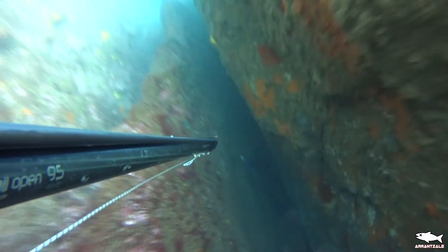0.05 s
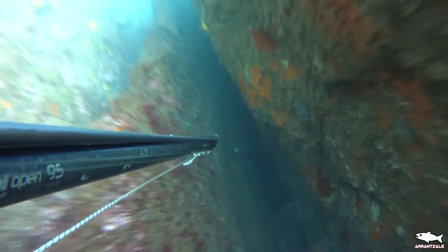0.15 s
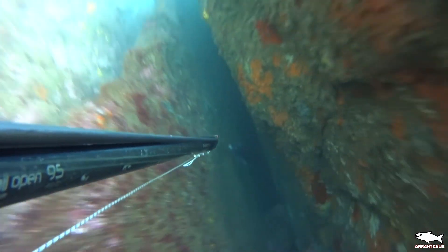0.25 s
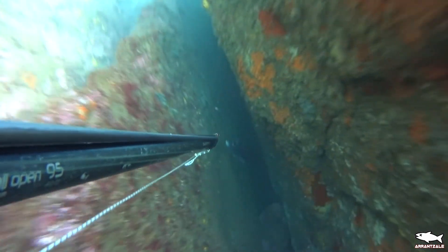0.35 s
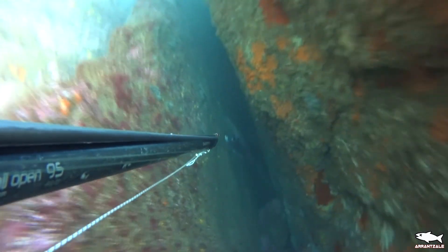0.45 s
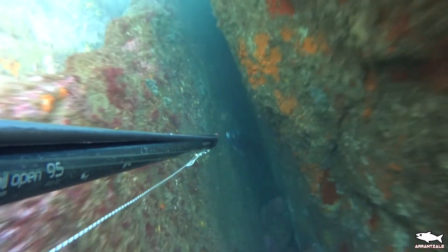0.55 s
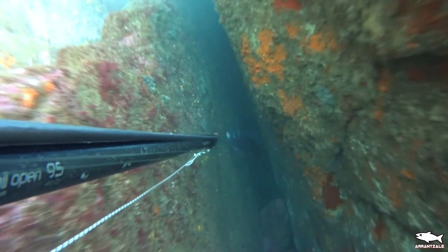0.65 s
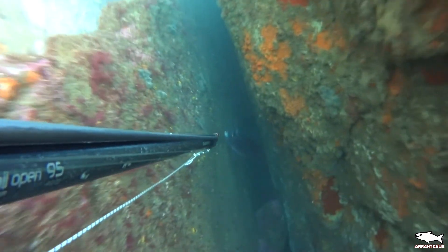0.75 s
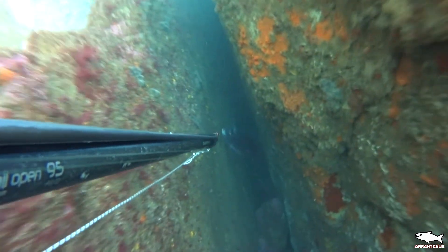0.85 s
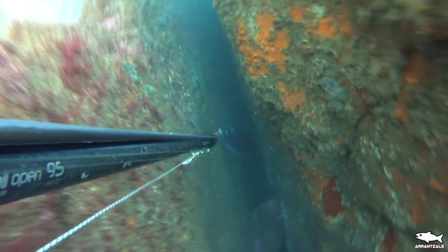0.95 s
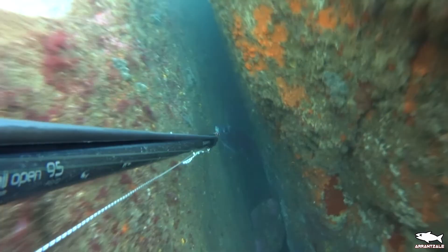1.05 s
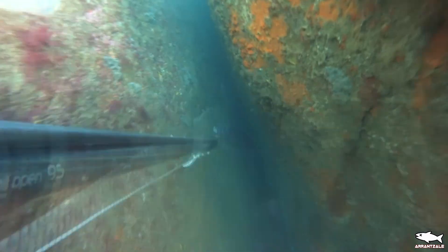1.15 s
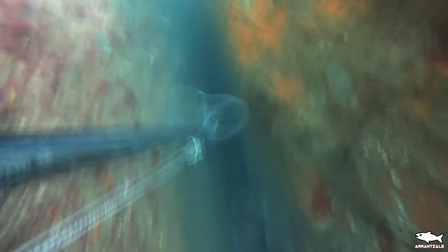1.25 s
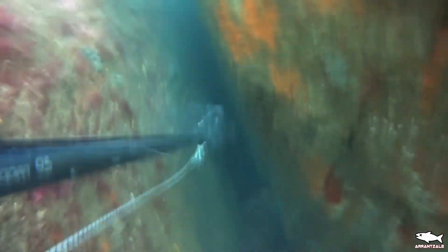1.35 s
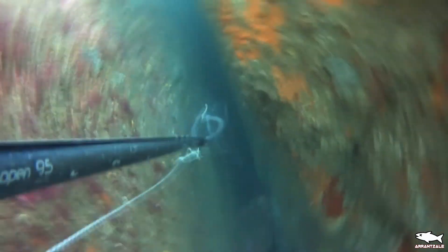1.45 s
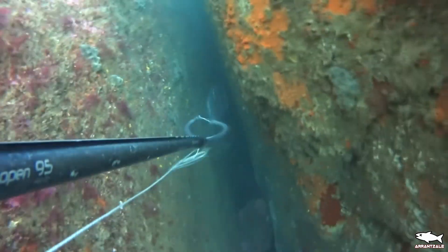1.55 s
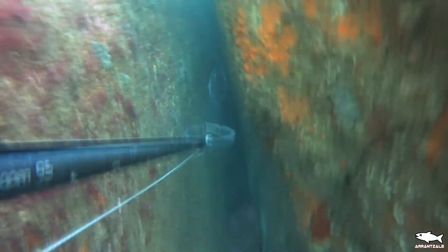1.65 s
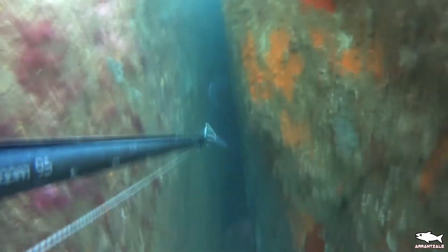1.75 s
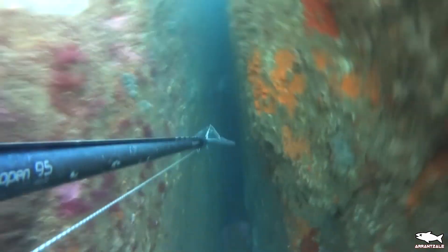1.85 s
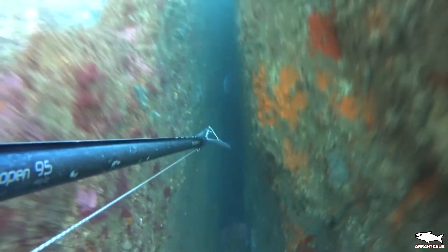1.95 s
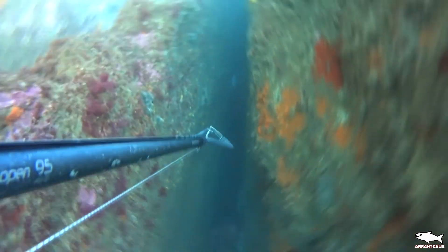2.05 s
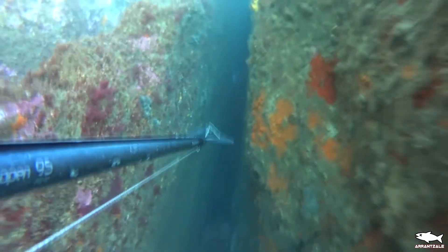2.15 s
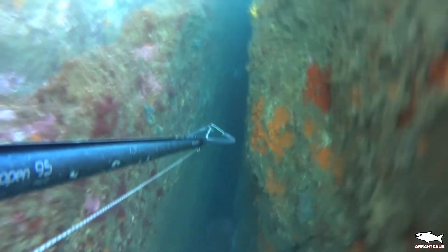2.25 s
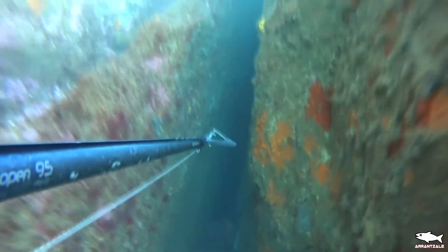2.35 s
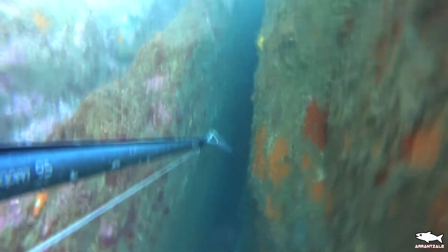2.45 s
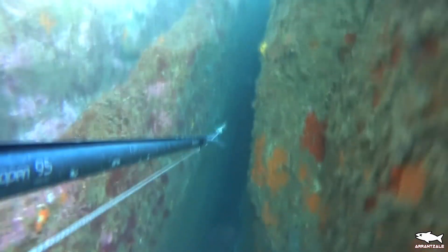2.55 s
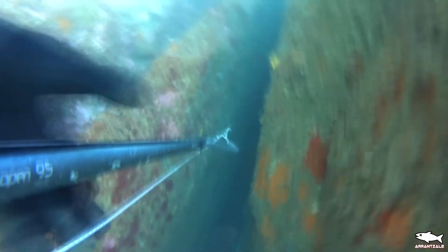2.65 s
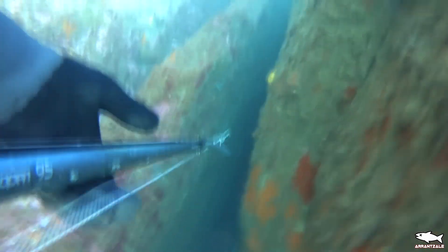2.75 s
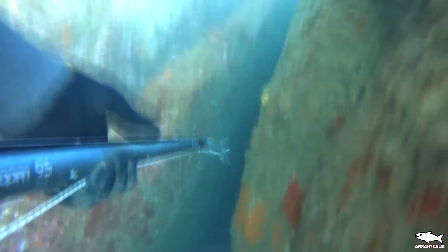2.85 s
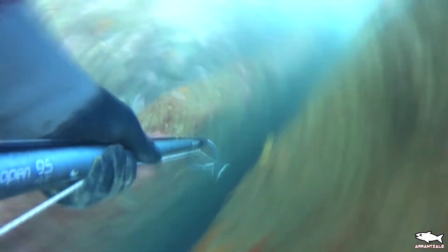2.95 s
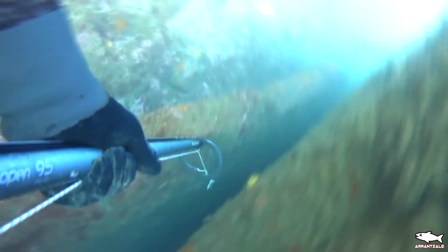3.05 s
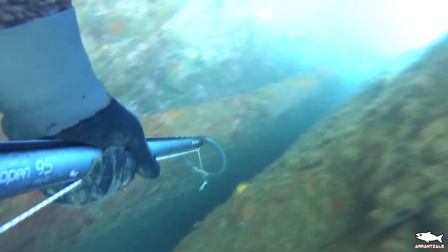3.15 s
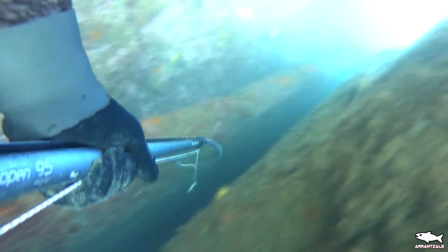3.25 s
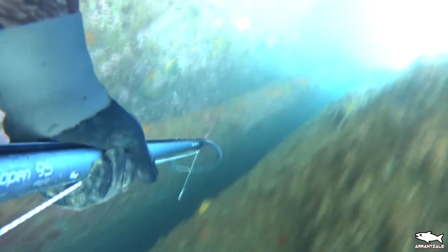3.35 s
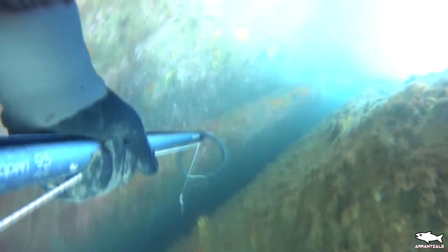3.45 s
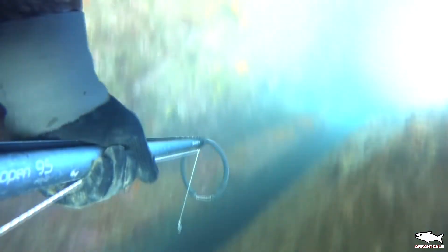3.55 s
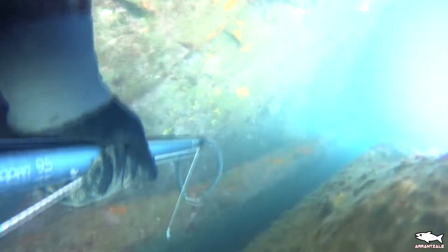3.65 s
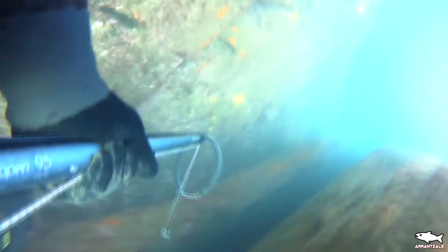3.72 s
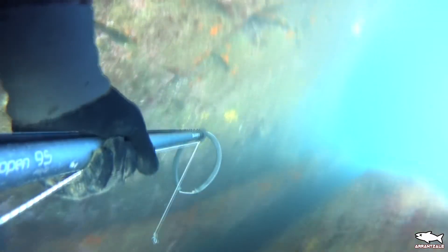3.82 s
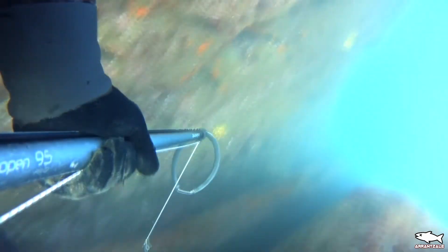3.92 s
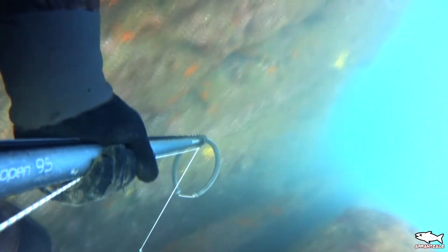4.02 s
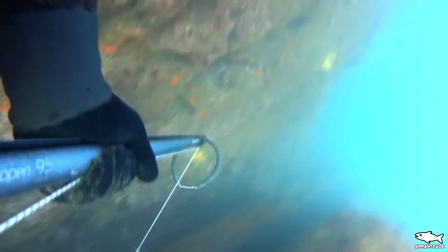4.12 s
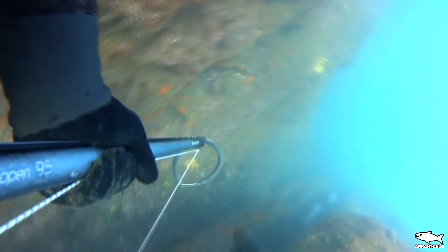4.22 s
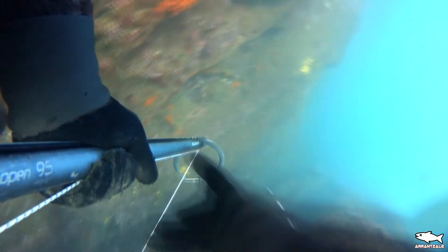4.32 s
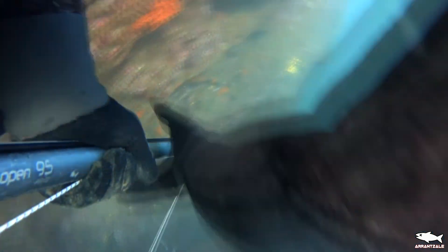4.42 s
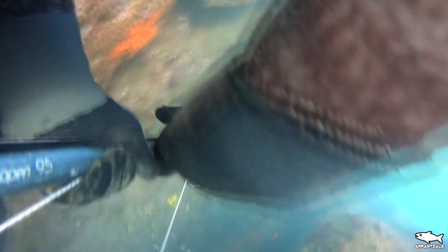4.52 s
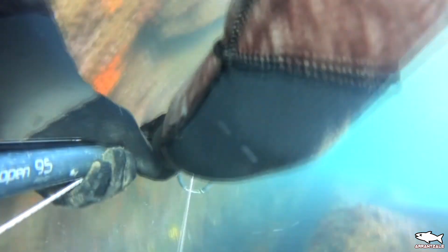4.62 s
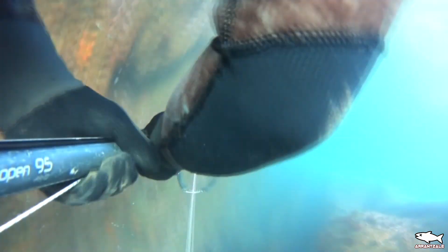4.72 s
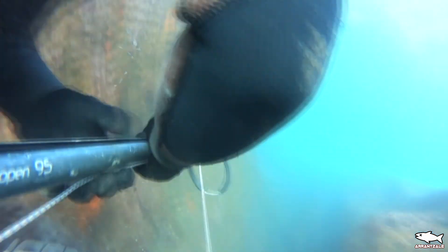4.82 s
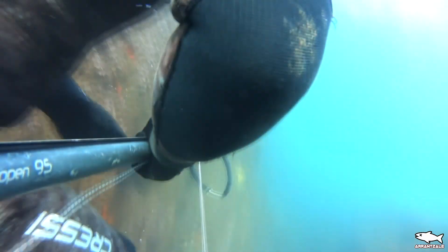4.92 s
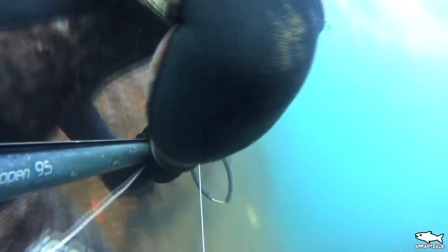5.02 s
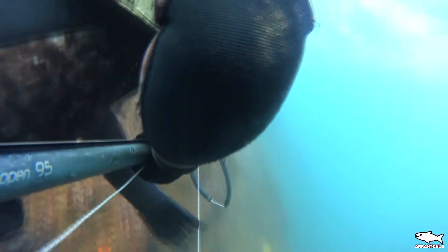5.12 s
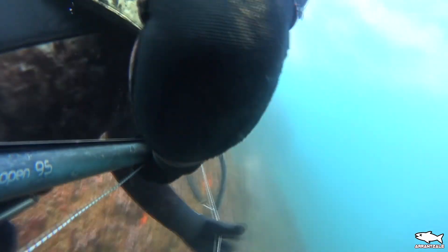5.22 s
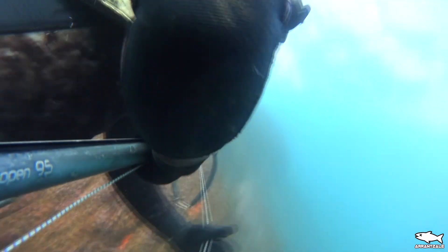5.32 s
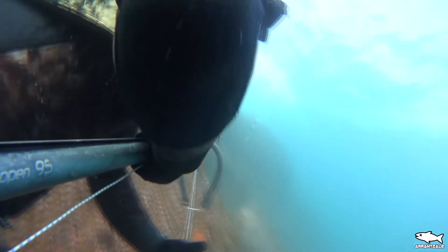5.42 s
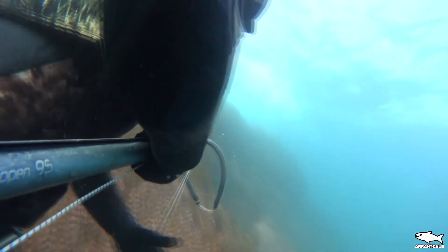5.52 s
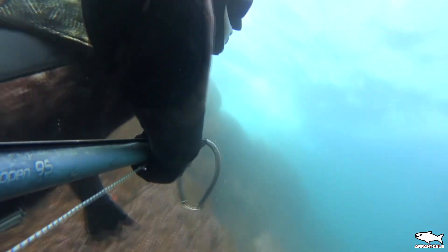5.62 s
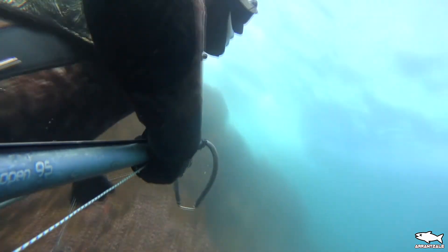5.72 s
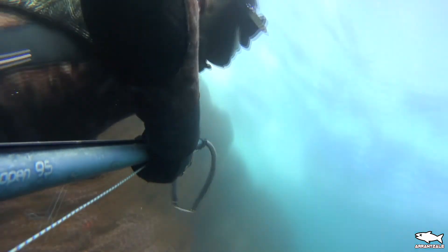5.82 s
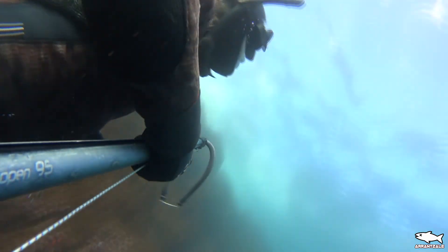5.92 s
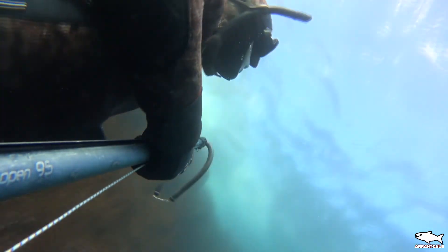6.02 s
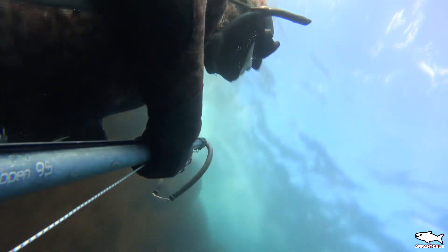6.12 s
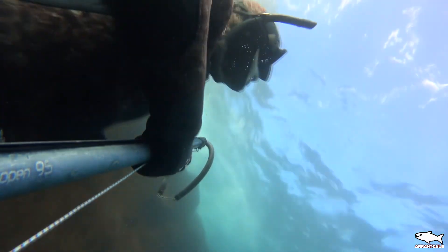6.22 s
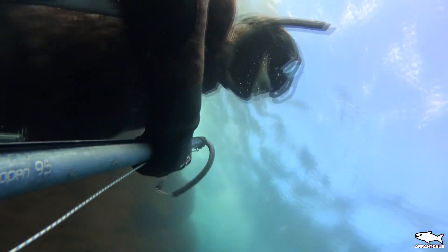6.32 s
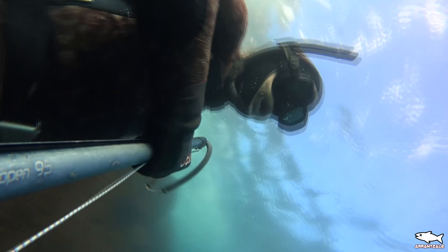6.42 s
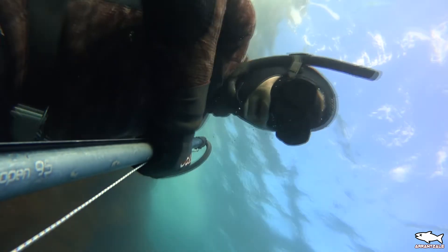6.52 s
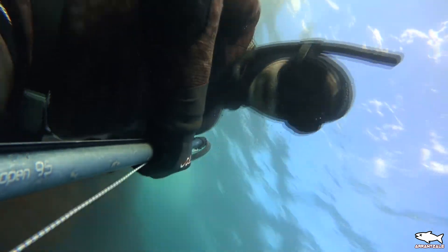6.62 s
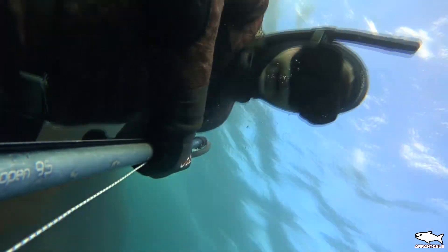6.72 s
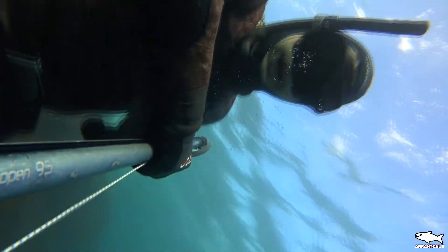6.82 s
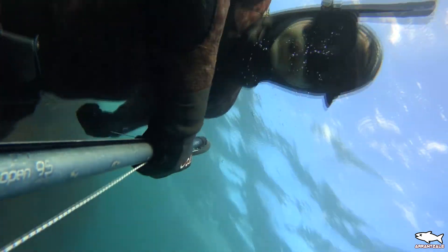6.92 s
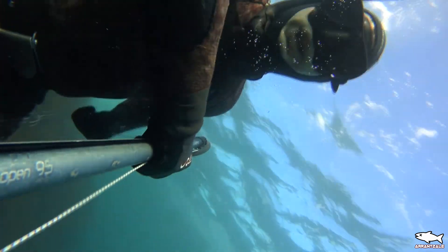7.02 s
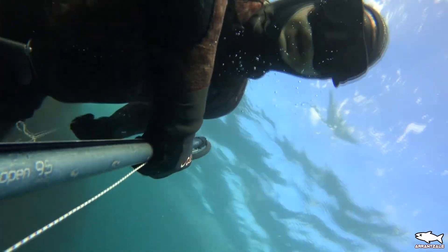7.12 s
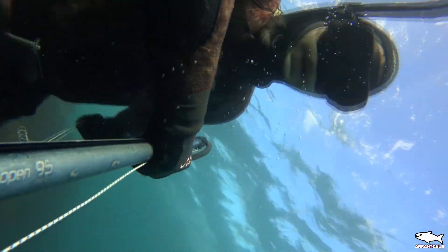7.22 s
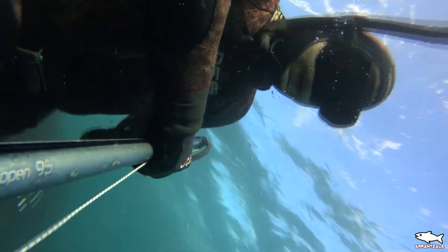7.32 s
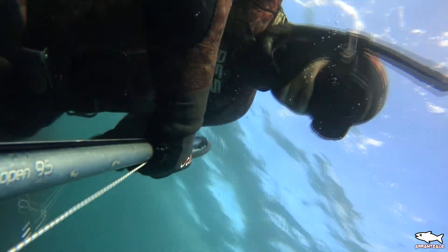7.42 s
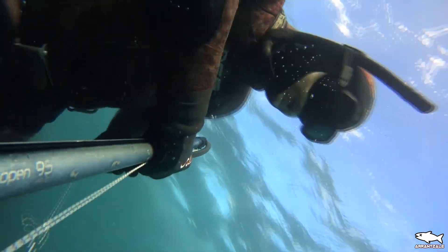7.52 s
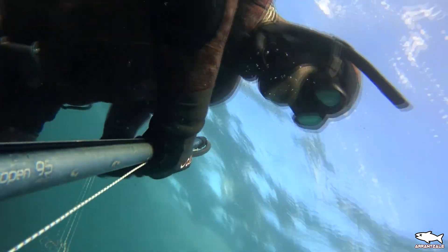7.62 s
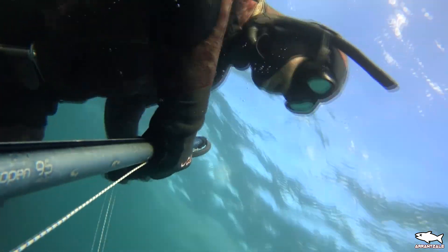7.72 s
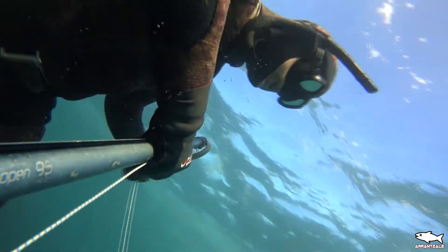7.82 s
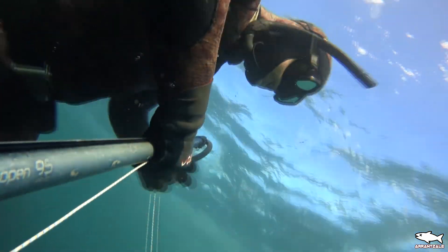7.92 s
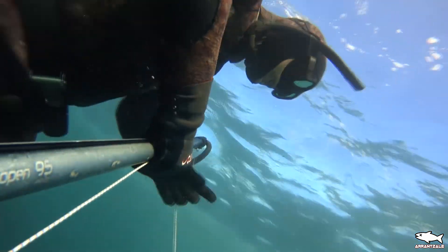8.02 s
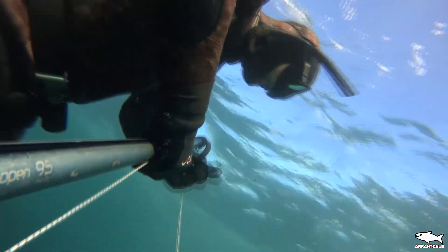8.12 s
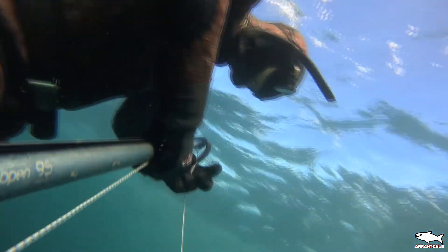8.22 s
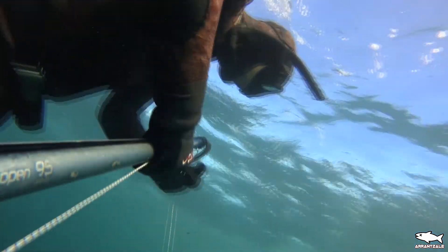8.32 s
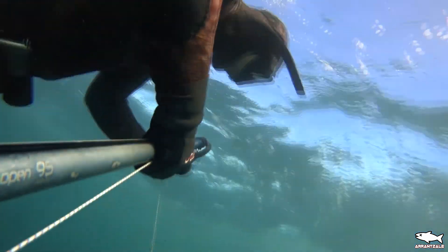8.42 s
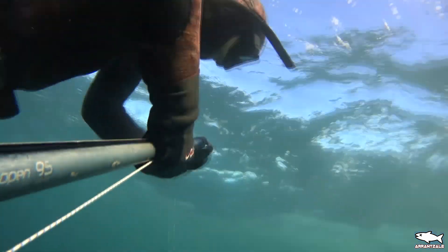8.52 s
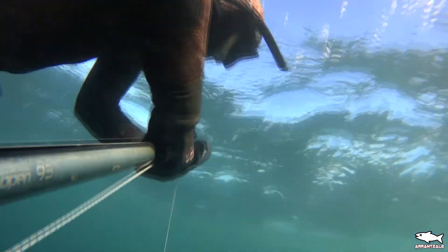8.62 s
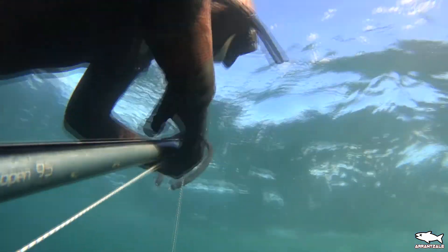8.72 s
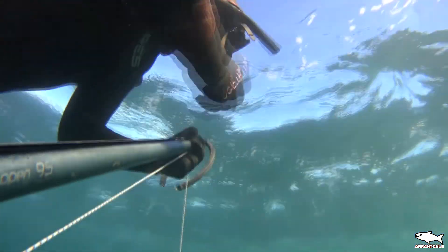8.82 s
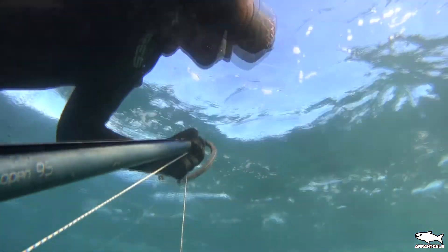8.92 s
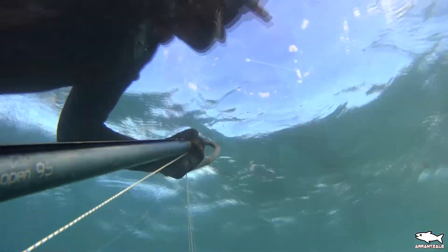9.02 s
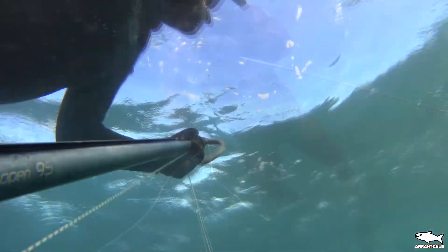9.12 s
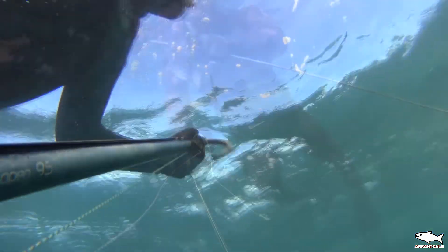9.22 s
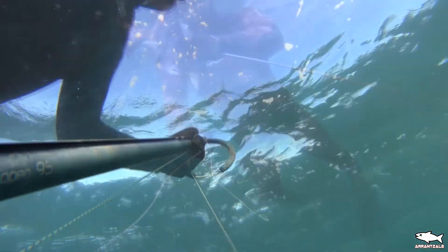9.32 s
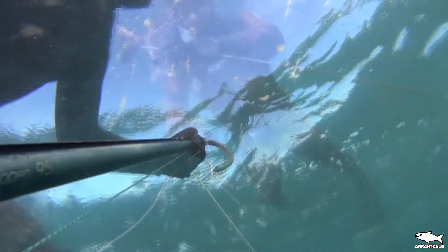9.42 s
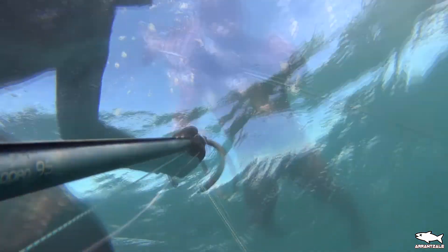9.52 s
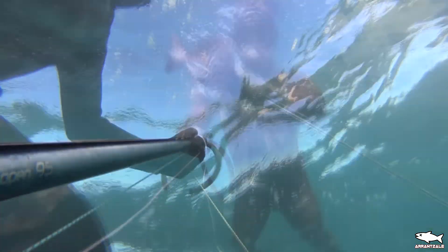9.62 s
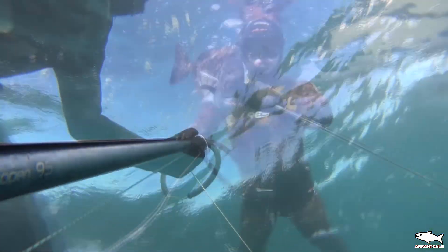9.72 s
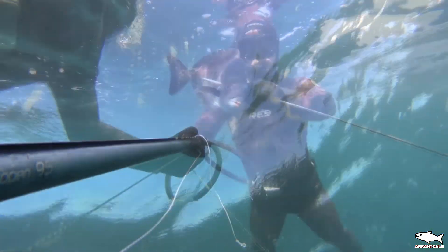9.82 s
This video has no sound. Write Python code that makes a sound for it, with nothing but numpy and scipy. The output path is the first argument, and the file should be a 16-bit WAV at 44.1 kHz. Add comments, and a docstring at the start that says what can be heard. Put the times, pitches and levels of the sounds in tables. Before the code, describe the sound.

Underwater, a speargun shot cracks and thuds, then the gun clatters and rubs in the hand while air bubbles out over rumbling water.

```python
"""A speargun fires under water and is handled on the way up, heard from a two-port microphone on its barrel.
Recoil and water rock the housing into a rumble. Line, glove and shaft rub, squeak and knock on grip and
fittings, and the hollow barrel hums and thumps. A loose metal part pings and trapped air gurgles out, over
bright ticks, faint snaps in the metal and hiss. Every mode reaches the two ports with a phase of its own, which
gives the gun its width."""
import sys
import numpy as np
from scipy import signal
from scipy.io import wavfile

SR = 44100
rng = np.random.default_rng(int(sys.argv[2]) if len(sys.argv) > 2 else 0)


def store_pcm(level_fs):
    """Save levels as 16-bit WAV."""
    pcm = np.round(np.clip(level_fs, -1, 1) * 32767).astype(np.int16)
    wavfile.write(sys.argv[1], SR, np.atleast_2d(pcm).T)


N = 434826

# Water pushing on the housing, one curve before the shot and one after: time_s, level_db
WATER_PUSH = [
    [(0.0, -32), (0.25, -41), (0.568, -46), (0.814, -51.5), (1.13, -51)],
    [(1.2, -41.5), (1.32, -27), (1.51, -26.5), (1.78, -37.5), (2.33, -38.5), (2.6, -23), (3.25, -37.5),
     (3.68, -33.5), (4.09, -45), (4.67, -35), (5.18, -38.5), (6.22, -43), (6.34, -34), (6.65, -37.5),
     (7.13, -35), (7.52, -39), (8.7, -39.5), (8.92, -44), (9.4, -36), (9.86, -46.5)],
]
# The rumble drifting between the ports: time_s, left_minus_right_db
RUMBLE_BALANCE = [(0, 1), (3, -1), (7, -3.5), (9.86, -2)]
# Recoil and hard grabs jolting the housing: start_s, peak_db, pitch_hz, t60_s
HOUSING_JOLTS = [(1.144, -6, 98, 0.046), (1.193, 0, 86.5, 0.091), (1.241, -17, 83.7, 0.31),
                 (2.466, -16.5, 88, 0.1), (3.723, -12, 100, 0.046), (4.11, -8, 134, 0.034),
                 (4.432, -17, 97.5, 0.27)]
# Tone of the bed of quiet water and microphone hiss: frequency_hz, density_db
BED_SPECTRUM = [(88, -30), (150, -17.5), (260, -19.5), (336, -15), (825, -13), (2030, -19.5), (2430, -22),
                (4220, -25.5), (10600, -29), (12000, -38.5), (15600, -75), (22000, -120)]
# How alike the two ports hear that bed: frequency_hz, correlation
BED_CORRELATION = [(60, -0.31), (220, 0.5), (830, -1.03), (3110, -0.14), (11600, 0.47)]

# Resonances of each part: pitch_hz, level_db, t60_s, left_lead_rad
HOUSING_MODES = [(34, -11.5, 0.12, -0.7), (49.3, 2.5, 0.09, -0.46), (81.5, 3, 0.2, -1.25),
                 (104.7, 5.5, 0.081, -1.78), (149, -4, 0.013, 3)]
BARREL_MODES = [(247.46, 11.5, 0.2, 1.94), (267.7, -12.5, 0.51, 0.32), (392, -22.5, 0.079, 4.1)]
GRIP_MODES = [(321.5, 0.5, 0.038, 1.3), (387, -3.5, 0.049, 1.3), (453, -14.5, 0.072, 1.1),
              (496, -4, 0.034, 2.2), (601.4, 2, 0.028, 2.24), (752, 3, 0.014, 1.65),
              (772, -7.5, 0.011, 1.8)]
FITTING_MODES = [(934, 4, 0.041, -1.64), (1056, 5, 0.036, 1.95), (1145, 2.5, 0.024, -1.05),
                 (1244, 2, 0.013, -1.85), (1423, 0, 0.025, 0), (1725, 1.5, 0.025, 2.5),
                 (1977, -5.5, 0.031, -1.43), (2260, -10, 0.039, -2.2), (2696, -12.5, 0.028, -1.7)]
METAL_MODES = [(3550, 3, 0.023, 0.8), (4120, 0, 0.0091, 0.4), (4630, -1, 0.019, 1.3),
               (5160, 3.5, 0.0098, 0.55), (6400, 5.5, 0.005, 1), (6650, -3.5, 0.0098, .6),
               (8200, 3, 0.0028, 0.28), (9760, -10.5, 0.018, .2)]
LOOSE_PART_MODES = [(1920, 6, 0.25, -0.58), (3900, -13.5, .08, .4), (5950, -7, 0.13, .6)]

# Light handling, one curve before the shot and one after: time_s, hum_db, dull_db, bright_db
LIGHT_HANDLING = [
    [(0.03, -45.5, -50.5, -70), (0.462, -65, -72, -85), (0.94, -81.5, -71, -79), (1.13, -82.5, -68, -81.5)],
    [(1.2, -58, -66.5, -72), (1.29, -42.5, -59.5, -54.5), (1.66, -43, -68, -68),
     (1.83, -44.5, -35.5, -52.5), (2.31, -45.5, -58.5, -74.5), (2.6, -25, -54.5, -54),
     (2.74, -35, -40, -48), (3.08, -35.5, -47.5, -57.5), (3.95, -53, -57, -53.5), (4.21, -37, -42, -60.5),
     (4.62, -37.5, -46.5, -56), (4.86, -39.5, -41, -63), (5.35, -40.5, -41.5, -52.5),
     (6.17, -40.5, -54.5, -64.5), (6.7, -46, -55.5, -64), (7.09, -35, -50.5, -69), (7.66, -44, -56.5, -63),
     (7.86, -40, -49.5, -59), (8.85, -45.5, -59.5, -65.5), (9.86, -43, -51, -69.5)],
]
# Strokes of shaft, line and glove along the gun:
# start_s, swell_s, ease_s, dull_db, bright_db, hiss_db, hum_db, shake_db
GUN_STROKES = [(0.203, 0.015, 0.032, -90, -95, -99, -47.5, -34),
               (0.488, 0.018, 0.018, -46.5, -68, -99, -43.5, -40),
               (1.138, 0.036, 0.034, -14, -18.5, -41, -15, -3),
               (1.213, 0.023, 0.011, -25, -21, -37.5, -26, -5),
               (1.247, 0.01, 0.099, -28, -40, -64, -21.5, -12.5),
               (1.402, 0.078, 0.039, -65, -84.5, -99, -30.5, -22),
               (1.604, 0.022, 0.013, -30, -36, -79, -18, -23),
               (1.633, 0.05, 0.03, -16, -23.5, -58.5, -18.5, -15),
               (1.812, 0.0074, 0.11, -39.5, -68, -99, -38, -40),
               (1.99, 0.066, 0.029, -34.5, -51.5, -99, -30.5, -24),
               (2.12, 0.016, 0.02, -45.5, -69.5, -99, -27.5, -35),
               (2.22, 0.082, 0.013, -33.5, -58, -99, -28, -42.5),
               (2.339, 0.013, 0.065, -40.5, -52, -99, -15, -38.5),
               (2.383, 0.0049, 0.048, -15, -29, -63, -21.5, -24.5),
               (2.425, 0.043, 0.018, -19, -17, -60, -25, -19.5),
               (2.486, 0.05, 0.022, -22, -23.5, -60, -18.5, -25),
               (2.633, 0.03, 0.02, -20, -29.5, -61, -19.5, -9.5),
               (2.733, 0.057, 0.023, -21.5, -27, -63, -18.5, -24),
               (2.914, 0.04, 0.02, -19.5, -28.5, -57.5, -17.5, -20),
               (3.372, 0.11, 0.068, -52.5, -44, -53.5, -40.5, -53),
               (3.572, 0.01, 0.028, -66, -40, -52, -31.5, -26),
               (3.641, 0.034, 0.044, -30.5, -37.5, -53, -43, -51),
               (3.72, 0.017, 0.044, -27, -24, -43, -23, -17),
               (3.759, 0.08, 0.054, -25.5, -26.5, -46.5, -26.5, -26),
               (3.888, 0.06, 0.17, -37, -40.5, -58, -38, -48),
               (4.05, 0.077, 0.061, -46, -29, -45, -18, -21.5),
               (4.383, 0.0049, 0.037, -55, -33, -45.5, -37, -29),
               (4.5, 0.32, 0.042, -43, -43, -66, -34.5, -35.5),
               (4.601, 0.056, 0.031, -56, -60, -99, -37, -51), (5.06, 0.13, 0.035, -64, -62, -99, -35, -57),
               (5.649, 0.13, 0.051, -27, -47, -86, -21, -34),
               (5.848, 0.027, 0.014, -66.5, -46.5, -99, -30, -30),
               (5.974, 0.0078, 0.068, -35, -49.5, -99, -54, -58),
               (6.04, 0.036, 0.053, -40, -63, -99, -48, -53),
               (6.189, 0.063, 0.061, -44, -51.5, -99, -48, -32),
               (6.337, 0.078, 0.065, -42.5, -56.5, -99, -33, -36),
               (6.948, 0.088, 0.13, -47, -64, -99, -52, -37),
               (7.26, 0.027, 0.074, -35.5, -54.5, -99, -37.5, -46),
               (7.663, 0.049, 0.033, -25, -42.5, -67, -28.5, -57.5),
               (7.806, 0.017, 0.068, -45, -52.5, -99, -35.5, -45),
               (7.874, 0.01, 0.073, -39.5, -61, -99, -27, -43),
               (7.931, 0.11, 0.048, -24.5, -43.5, -81, -44.5, -50),
               (8.119, 0.014, 0.051, -43, -55, -99, -46, -24.5),
               (8.287, 0.029, 0.04, -32.5, -45.5, -99, -28, -62),
               (8.371, 0.021, 0.033, -37.5, -45.5, -99, -57, -32),
               (8.507, 0.037, 0.13, -41, -62, -99, -43.5, -27.5),
               (8.639, 0.11, 0.0071, -44, -50.5, -99, -45, -25.5),
               (9.048, 0.074, 0.073, -62, -62, -99, -57, -32),
               (9.502, 0.059, 0.14, -66, -85, -99, -44, -35)]
# The line jerking tight against the barrel: start_s, peak_db, rise_s, t60_s
LINE_THUMPS = [(1.238, -7.5, 0.00095, 0.036), (1.284, -11.5, 0.0031, 0.075), (1.613, -8.5, 0.00064, 0.34),
               (1.69, -9.5, 0.0037, 0.15), (1.849, -22, 0.0085, 0.73), (2.041, -18.5, 0.011, 0.14),
               (2.482, -9, 0.0043, 0.33), (2.551, -4.5, 0.00048, 0.18), (2.686, -2.5, 0.00095, 0.052),
               (2.816, -4, 0.00077, 0.14), (2.962, -7.5, 0.002, 0.037), (4.337, -27.5, 0.0072, 0.18),
               (4.392, -11, 0.0042, 0.11), (4.738, -16.5, 0.0037, 0.21), (6.058, -24.5, 0.0098, 0.21),
               (7.037, -24, 0.012, 0.21), (7.679, -16.5, 0.0067, 0.17), (7.815, -22, 0.0048, 0.067),
               (7.886, -27.5, 0.0083, 0.32), (7.939, -15, 0.0019, 0.29), (7.98, -13, 0.012, 0.26),
               (8.028, -8.5, 0.033, 0.08), (8.286, -19, 0.008, 0.11)]
# A stroke catching a resonance of the grip or fittings so that it squeaks: start_s, peak_db, pitch_hz
GUN_SQUEAKS = [(1.156, -20.5, 1014), (1.166, -17, 1427), (1.177, -18, 1085), (2.446, -19, 377),
               (2.449, -34, 2800), (2.939, -25, 961), (7.881, -40.5, 926), (7.944, -19.5, 432),
               (8.04, -24.5, 404), (1.163, -29, 1123), (1.18, -22, 905), (1.262, -38, 2000),
               (1.463, -39, 980), (1.654, -17, 910), (1.826, -30.5, 967), (2.009, -29, 980),
               (2.339, -29.5, 965), (2.388, -17.5, 1420), (2.445, -17, 1176), (2.513, -22, 914),
               (2.658, -18, 1663), (2.745, -16, 1717), (2.748, -10.5, 1153), (2.79, -22, 920),
               (5.748, -24.5, 987), (6.06, -37.5, 1020), (2.108, -37.5, 938), (8.295, -25.5, 413)]
# Blows on the fittings: start_s, body_db, crack_db
FITTING_KNOCKS = [(1.138, -15, -28), (1.1426, -13, -40), (1.157, -21, -24), (1.171, -7, -28),
                  (1.191, -15, -17), (1.2285, -15, -16), (1.366, -12, -38), (1.305, -29, -70),
                  (1.385, -19, -78), (1.6047, -21.5, -51), (1.618, -5.5, -52), (1.6424, -10, -65),
                  (1.7394, -26.5, -78), (1.775, -35.5, -81), (1.8184, -36, -40.5), (1.845, -38, -39),
                  (2.015, -20, -86), (2.072, -23, -76), (2.391, -11.5, -37.5), (2.443, -22, -43),
                  (2.4554, -15, -50), (2.52, -29, -40), (2.6345, -11, -43), (2.667, -27, -55),
                  (2.7325, -20, -62), (2.792, -15, -50), (2.929, -14, -55), (2.9595, -6.5, -21),
                  (3.104, -25.5, -81), (3.4097, -27.5, -65), (3.4639, -19.5, -45), (3.5746, -7, -27),
                  (3.6415, -18.5, -57), (3.72, -3, -40), (3.727, -3, -42), (3.742, -9, -40),
                  (3.835, -8.5, -20), (3.9819, -21.5, -55), (4.0924, -18, -55), (4.1608, -15.5, -28),
                  (4.3883, -1, -14.5), (4.3928, -1.5, -15), (4.405, -30, -41), (4.427, -48, -45),
                  (4.4805, -17, -51), (5.697, -23, -76), (5.743, -41, -48.5), (5.9758, -25, -51),
                  (6.2468, -30, -66), (6.4184, -26, -42), (6.456, -49, -46), (6.503, -32.5, -44),
                  (6.943, -34, -48), (7.343, -34, -69), (7.6485, -24.5, -56), (7.675, -23.5, -65),
                  (7.881, -37, -70), (7.938, -19, -57), (8.022, -22, -54), (8.0337, -14, -34),
                  (8.123, -26, -50), (8.3913, -16, -28.5), (8.4396, -37, -43), (8.571, -28, -43.5),
                  (8.731, -22.5, -47)]
# Tiny bright ticks in the water: start_s, peak_db, pitch_hz, t60_s
WATER_TICKS = [(1.217, -26, 3600, 0.012), (1.221, -30, 4300, 0.017), (1.226, -24, 4330, 0.011),
               (1.234, -23.5, 3840, 0.012), (1.846, -36, 3740, 0.013), (4.797, -56, 6600, 0.01),
               (5.079, -53, 6020, 0.01), (5.25, -51, 5800, 0.01), (5.5123, -52.5, 7400, 0.0049),
               (6.484, -55, 6200, 0.0066), (8.46, -57, 6000, 0.0064), (8.822, -53, 6000, 0.0041),
               (1.3647, -48, 4990, 0.012), (1.846, -42.5, 6600, 0.014), (2.308, -42, 8200, 0.0024),
               (2.9587, -23, 2370, 0.0081), (3.726, -31.5, 6000, 0.0082), (3.834, -35, 5700, 0.0093),
               (4.0606, -53, 6100, 0.012), (4.1085, -30, 5600, 0.0074), (4.1593, -42, 5360, 0.015),
               (4.356, -53, 6050, 0.016), (4.298, -51, 6900, 0.004), (4.514, -53, 4250, 0.02),
               (4.52, -54, 6280, 0.03), (5.2385, -39.5, 6600, 0.0019), (5.291, -42, 7070, 0.0026),
               (7.0867, -55, 5940, 0.013), (7.7136, -44, 6650, 0.0054), (8.1225, -53.5, 6650, 0.009),
               (8.3917, -50, 4700, 0.0054)]
# Taps on the loose metal part: start_s, level_db, overtone_offset_db
LOOSE_PART_TAPS = [(2.2702, -59, 10.5), (4.3296, -59.5, -15), (4.4247, -59, 13.5), (5.239, -61, 10),
                   (5.293, -54, 3), (5.4495, -76, -15), (5.5115, -53, -5), (5.595, -51, 4.5),
                   (8.1369, -56, -30), (8.576, -56, -24)]
# The loud bubbles leaving the barrel: start_s, level_db, pitch_hz
BIG_BUBBLES = [(3.235, -35, 580), (3.283, -31.5, 553), (3.54, -51, 624), (3.574, -50, 680),
               (3.643, -33, 623), (3.719, -27, 793), (3.768, -34, 594), (3.834, -33.5, 424),
               (3.925, -29.5, 735), (4.026, -27.5, 795), (4.045, -31.5, 577), (4.112, -37, 504),
               (4.197, -28.5, 601), (4.228, -40, 578), (4.278, -28.5, 748), (4.3, -24, 608),
               (4.318, -32, 875), (4.33, -34, 625), (4.345, -40, 800), (4.389, -22.5, 690),
               (4.42, -31.5, 568), (4.435, -24.5, 766), (4.477, -33, 887), (4.506, -19.5, 610),
               (4.58, -31, 919), (4.588, -26.5, 621), (4.615, -28, 776), (4.668, -27.5, 720),
               (4.685, -27.5, 610), (4.77, -27.5, 588), (4.785, -30, 1000), (4.877, -25, 597),
               (4.897, -25, 590), (4.975, -32, 624), (5.007, -32, 567), (5.056, -33, 592), (5.09, -31, 546),
               (5.065, -41, 1112), (5.11, -43, 1063), (5.19, -39, 903), (5.2, -46, 723), (5.25, -38, 1067),
               (5.27, -36, 588), (5.37, -39.5, 970), (5.31, -48, 558), (5.36, -36.5, 452),
               (5.385, -34.5, 460)]


def from_db(db):
    """Gain of a level in dB."""
    return np.exp(np.asarray(db) * np.log(10) / 20)


def in_time(rows):
    """Envelopes through the rows of a curve, one value a sample."""
    times, *columns = np.transpose(rows)
    return [np.interp(np.arange(N) / SR, times, column) for column in columns]


def at_hz(points, hz):
    """Read a spectrum on a log-frequency axis."""
    frequencies, values = np.transpose(points)
    return np.interp(np.log(hz), np.log(frequencies), values)


def drift(rate_hz):
    """Smooth random modulation with a spread of 1."""
    step, settle = 40, 2000
    pole = np.exp(-2 * np.pi * rate_hz * step / SR)
    noise = rng.standard_normal(N // step + settle + 2)
    slow = signal.lfilter([1], [1, -2 * pole, pole * pole], noise)[settle:]
    return np.interp(np.arange(N) / step, np.arange(len(slow)), slow / np.std(slow))


def lumpy(level_db, lumps_db):
    """The light, wavering pressure of water and hands."""
    return from_db(level_db + lumps_db * drift(11.7))


def pressure(levels_db, steep, let_go_s=0.012):
    """Each stroke grabs, swells to its hardest, eases and lets go; steep deepens the swell."""
    out, grab_s = np.zeros(N), 0.004
    under_peak_db = [45, steep * 8.5, 0, steep * 15, 45]
    for (start, swell, ease, *_), level_db in zip(GUN_STROKES, levels_db):
        corners = start + np.cumsum([-grab_s, grab_s, swell, ease, let_go_s])
        span = np.arange(round(corners[0] * SR), round(corners[-1] * SR))
        out[span] += from_db(level_db - np.interp(span / SR, corners, under_peak_db))
    return out


def grains(per_s, spread_db):
    """Random slips of uneven size and sign, rms 1."""
    sizes = from_db(spread_db * np.minimum(rng.exponential(1, N), 4)) * rng.choice([-1, 1], N)
    slips = sizes * (rng.random(N) < per_s / SR)
    return slips / np.std(slips)


def ring(force, hz, t60, lead, phase_shift=1):
    """One decaying mode; the left port hears it lead radians ahead of the right."""
    pole = from_db(-60 / (t60 * SR)) * np.exp(2j * np.pi * hz / SR)
    phasor = signal.lfilter([1], [1, -pole], force + 1e-18)
    half_lead = np.exp(0.5j * lead) * phase_shift
    return np.array([(phasor * half_lead).imag, (phasor * np.conj(half_lead)).imag])


def rubbed(modes, gain, per_s, spread_db, patchy_db, wobble_rad):
    """Slips under a pressure curve drive the modes; each comes and goes as the stereo phase wobbles."""
    slips = [grains(per_s, spread_db) for _ in range(2)]
    phase_shift = np.exp(0.5j * wobble_rad * drift(10.2))
    patchy_boost_db = patchy_db ** 2 * np.log(10) / 20   # mean power added by the coming and going
    out, mid_power = 0, 0
    for k, (hz, level_db, t60, lead) in enumerate(modes):
        ring_rms = np.sqrt(t60 * SR / (4 * np.log(1000)))
        force = gain * from_db(level_db + patchy_db * drift(5.66)) * slips[k % 2] / ring_rms
        out = out + ring(force, hz, t60, lead, phase_shift)
        mid_power += (from_db(level_db + patchy_boost_db) * np.cos(lead / 2)) ** 2
    return out / np.sqrt(mid_power)


def struck(modes, times, blow_db, t60_scale, uneven_db):
    """Each blow is shared among the modes and strikes each with a strength of its own."""
    out, length = np.zeros((2, N + SR)), SR // 8
    scatter_db = uneven_db * rng.standard_normal((len(times), len(modes)))
    for k, (hz, level_db, t60, lead) in enumerate(modes):
        tail = ring(signal.unit_impulse(length), hz, t60 * t60_scale, lead) * (-1) ** k
        for start, gain in zip(times, from_db(blow_db + level_db + scatter_db[:, k])):
            at = round(start * SR)
            out[:, at:at + length] += gain * tail
    return out[:, :N] / np.sqrt(len(modes))


def blips(rows, lead, sag):
    """Short tones that swell, sag in pitch and fade; rows: start_s, peak_db, pitch_hz, rise_s, t60_s."""
    out, t = np.zeros((2, N)), np.arange(SR // 5) / SR
    port_phase = np.array([[lead / 2], [-lead / 2]])
    for start, peak_db, hz, rise, t60 in rows:
        envelope = (1 - np.exp(-t / max(rise, 1e-4))) ** 2 * from_db(-60 * t / max(t60, 0.003))
        tone = np.sin(2 * np.pi * hz * (t - sag * t ** 2) + port_phase) / np.cos(lead / 2)
        at = round(start * SR)
        out[:, at:at + len(t)] += from_db(peak_db) * envelope / envelope.max() * tone
    return out


def muffle(x, hz):
    """Rubber, glove and water take off the treble."""
    return signal.sosfilt(signal.butter(4, hz, fs=SR, output="sos"), x)


def pan(x, left_db):
    """Tilt a pair towards the left port."""
    return x * from_db(np.array([[0.5], [-0.5]]) * left_db)


def wander(x, depth_s):
    """The grip shifts, so the resonances bend slightly up and down."""
    read_at = np.arange(N) + depth_s * SR * drift(9.0)
    return np.array([np.interp(read_at, np.arange(N), side) for side in x])


def housing_rumble(shake_db):
    """Lumpy water pressure and strokes rock the housing; jolts swing it for a few cycles."""
    water = lumpy(in_time(np.concatenate(WATER_PUSH))[0], lumps_db=1.5)
    gain = water + pressure(shake_db, steep=1.25, let_go_s=0.022)
    rocking = rubbed(HOUSING_MODES, gain, per_s=370, spread_db=2.5, patchy_db=2.2, wobble_rad=0.98)
    jolts = blips([(s, db, hz, 0.003, t60) for s, db, hz, t60 in HOUSING_JOLTS], lead=-1.3, sag=0.27)
    return pan(muffle(rocking, hz=310), in_time(RUMBLE_BALANCE)[0]) + jolts


def water_bed(level_db=-69):
    """Quiet water and microphone hiss: half-octave noise bands, each with its own level and width."""
    out, edges = 0, 140 * 2 ** np.arange(0, 7, 0.5)
    white = rng.standard_normal((2, 2, N))
    for k, (low, high) in enumerate(zip(edges, edges[1:])):
        bandpass = signal.butter(2, [low, high], "band", fs=SR, output="sos")
        mid, side = signal.sosfilt(bandpass, white[k % 2])
        centre_hz = np.sqrt(low * high)
        alike = np.clip(at_hz(BED_CORRELATION, centre_hz), -0.95, 0.95)
        band = np.sqrt(1 + alike) * mid + np.sqrt(1 - alike) * side * [[1], [-1]]
        out = out + from_db(at_hz(BED_SPECTRUM, centre_hz)) * band
    mid_rms = np.sqrt(np.mean(np.mean(out, axis=0) ** 2))
    return from_db(level_db) * out / mid_rms


def metal_crackle():
    """Faint scattered snaps ring in the metal parts."""
    snaps = from_db(-93) * grains(per_s=28, spread_db=3)
    return sum(ring(snaps, hz, t60 * 0.046, lead) for hz, _, t60, lead in METAL_MODES[2::2])


def barrel_hum(light_db, hum_db):
    """The hollow barrel hums when rubbed and rings on its lowest mode when the line thumps it."""
    gain = lumpy(light_db, lumps_db=2.5) + pressure(hum_db, steep=1.3, let_go_s=0.035)
    hum = rubbed(BARREL_MODES, gain, per_s=490, spread_db=1.5, patchy_db=1.0, wobble_rad=0.69)
    hz, _, _, lead = BARREL_MODES[0]
    thumps = blips([(s, db, hz, rise, t60) for s, db, rise, t60 in LINE_THUMPS], lead, sag=0.27)
    return pan(muffle(hum, hz=680) + thumps, left_db=1.5)


def handling_rub(light_dull_db, light_bright_db, dull_db, bright_db):
    """Dense slips give a dull rattle in the grip and a bright one in the fittings; both catch and squeak."""
    gain = lumpy(light_dull_db, lumps_db=3.0) + pressure(dull_db, steep=0.93)
    dull = rubbed(GRIP_MODES, gain, per_s=900, spread_db=4.0, patchy_db=6.5, wobble_rad=0.91)
    grit = lumpy(light_bright_db, lumps_db=1.5) + pressure(bright_db, steep=0.9)
    grit *= from_db(1.8 * drift(45))
    bright = rubbed(FITTING_MODES, grit, per_s=2600, spread_db=3.5, patchy_db=3.5, wobble_rad=0.6)
    squeaks = blips([(*row, 0.011, 0.04) for row in GUN_SQUEAKS], lead=1.7, sag=0.3)
    stutter = 1 + 0.8 * drift(150)
    return wander(muffle(dull, hz=1560) + muffle(bright, hz=3600) + squeaks * stutter, depth_s=0.0003)


def metal_slide(hiss_db):
    """Fine fast slips hiss in the metal while something slides."""
    gain = pressure(hiss_db, steep=0.72) * from_db(1.5 * drift(37))
    return rubbed(METAL_MODES, gain, per_s=3600, spread_db=3.0, patchy_db=1.5, wobble_rad=0.82)


def fitting_knocks():
    """A blow rings grip and fittings for body and cracks in the metal for attack."""
    times, body_db, crack_db = np.transpose(FITTING_KNOCKS)
    body = struck(GRIP_MODES + FITTING_MODES, times, body_db, t60_scale=0.66, uneven_db=3.5)
    crack = struck(METAL_MODES, times, crack_db, t60_scale=0.4, uneven_db=2.5)
    return muffle(body, hz=3200) + crack


def water_ticks():
    """Each tick is one short high ring."""
    return blips([(s, db, hz, 0.0002, t60) for s, db, hz, t60 in WATER_TICKS], lead=0.6, sag=0)


def loose_part_pings():
    """The low mode always rings; how much of the overtones depends on where the part is touched."""
    times, level_db, offset_db = np.transpose(LOOSE_PART_TAPS)
    low = struck(LOOSE_PART_MODES[:1], times, level_db - 5, t60_scale=1, uneven_db=0)
    overtones = struck(LOOSE_PART_MODES[1:], times, level_db + offset_db, t60_scale=1, uneven_db=1.5)
    chatter = 1 + 0.5 * drift(90)
    return low + overtones * chatter


def air_gurgle():
    """Trapped air leaves in a fluttering stream; each bubble swells, rings and sags. Low ones sit right."""
    small_count, stream_s, lowest_hz, highest_hz = 280, (3.05, 5.45), 533.2, 1008
    rise_s, t60_s, split_hz = 0.013, 0.11, 670
    when, pitch, size = rng.random((small_count, 3)).T
    small_db = -45 + (2 * size - 1)
    small_hz = lowest_hz * (highest_hz / lowest_hz) ** pitch ** 2
    small = np.transpose([np.interp(when, [0, 1], stream_s), small_db, small_hz])
    bubbles = [(*row, rise_s, t60_s) for row in [*BIG_BUBBLES, *small]]
    low = blips([row for row in bubbles if row[2] < split_hz], lead=1.8, sag=0.78)
    high = blips([row for row in bubbles if row[2] >= split_hz], lead=2.0, sag=0.56)
    flutter = 1 + 0.45 * drift(69)
    return (pan(low, left_db=-6) + high) * flutter


def scene():
    """The gun up close, its parts all driven by the same strokes, over the quiet water."""
    _, _, _, dull_db, bright_db, hiss_db, hum_db, shake_db = np.transpose(GUN_STROKES)
    light_hum_db, light_dull_db, light_bright_db = in_time(np.concatenate(LIGHT_HANDLING))
    hum = barrel_hum(light_hum_db, hum_db)
    friction = handling_rub(light_dull_db, light_bright_db, dull_db, bright_db) + metal_slide(hiss_db)
    gun = hum + friction + housing_rumble(shake_db) + air_gurgle() + fitting_knocks() + loose_part_pings()
    return gun + water_ticks() + metal_crackle() + water_bed()


def record(dry):
    """Thin the deepest rumble, duck after loud peaks, soft-clip at full scale and cut the top."""
    low_cut_hz, high_cut_hz = 32.4, 12050
    threshold_db, duck_slope, attack_s, release_db_per_s = -13, 0.3, 0.014, 4.03
    thinned = signal.sosfilt(signal.butter(2, low_cut_hz, "high", fs=SR, output="sos"), dry)
    release_db = release_db_per_s * np.arange(N) / SR
    peak_db = 20 * np.log10(np.max(np.abs(thinned), axis=0) + 1e-6)
    held_db = np.maximum.accumulate(peak_db + release_db) - release_db
    duck_db = -duck_slope * np.maximum(held_db - threshold_db, 0)
    pole = np.exp(-1 / (attack_s * SR))
    ducked = thinned * from_db(signal.lfilter([1 - pole], [1, -pole], duck_db))
    clipped = ducked / (1 + ducked ** 6) ** (1 / 6)
    return signal.sosfilt(signal.cheby2(14, 60, high_cut_hz, fs=SR, output="sos"), clipped)


dry = scene()
out = record(dry)
store_pcm(out)
```